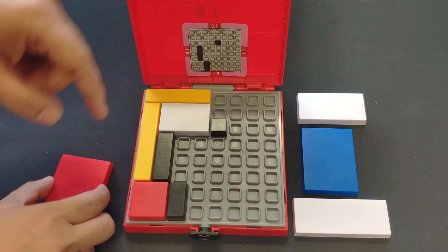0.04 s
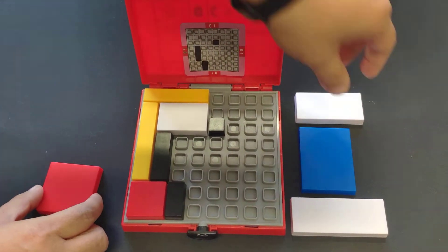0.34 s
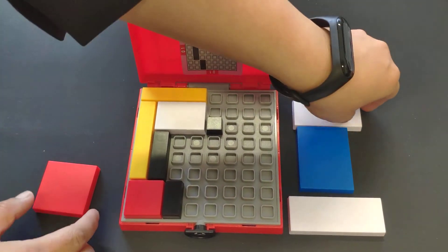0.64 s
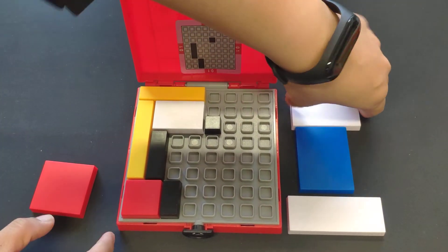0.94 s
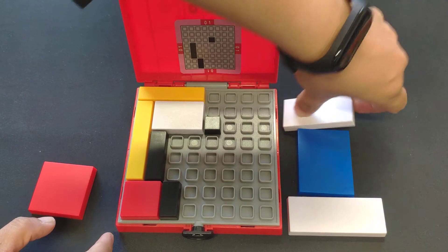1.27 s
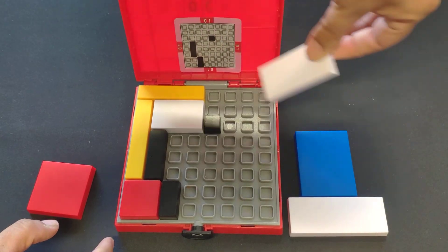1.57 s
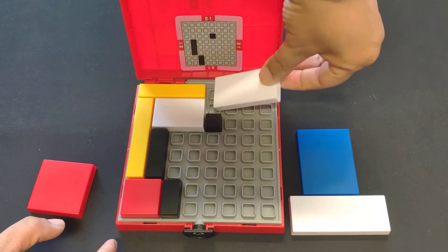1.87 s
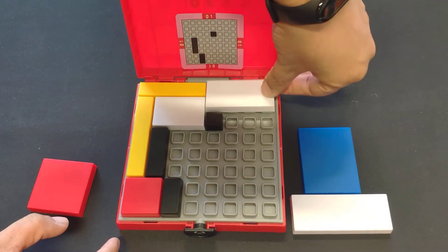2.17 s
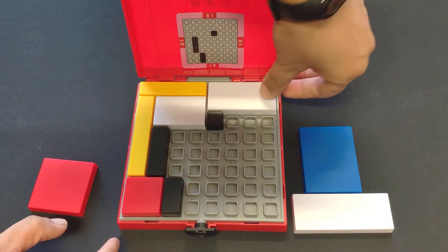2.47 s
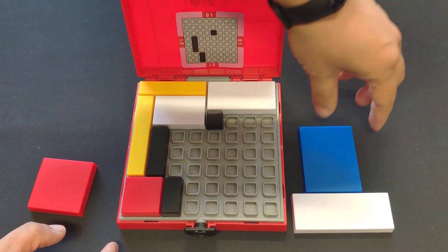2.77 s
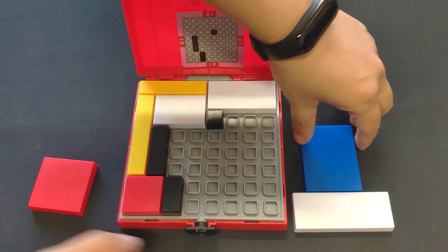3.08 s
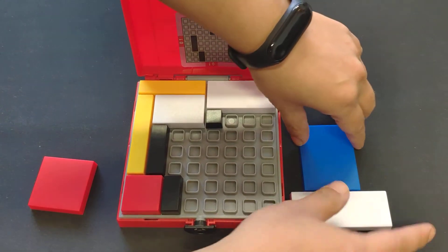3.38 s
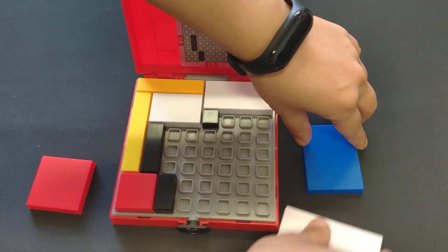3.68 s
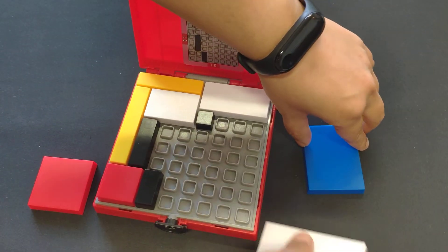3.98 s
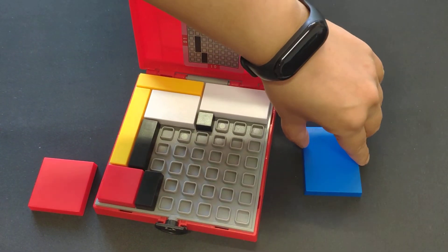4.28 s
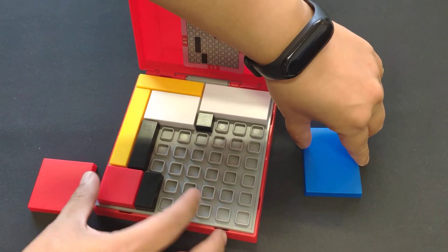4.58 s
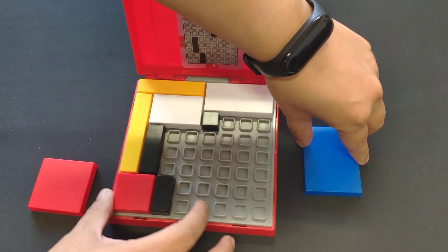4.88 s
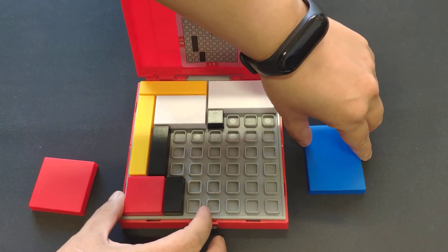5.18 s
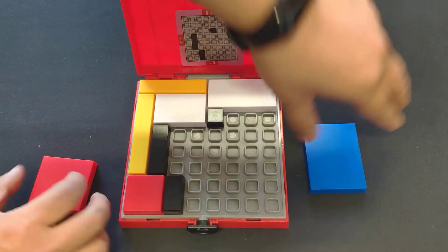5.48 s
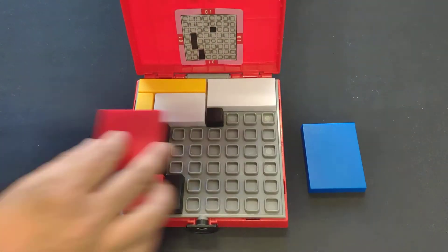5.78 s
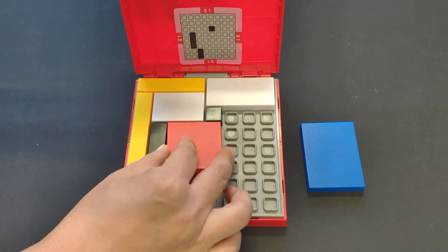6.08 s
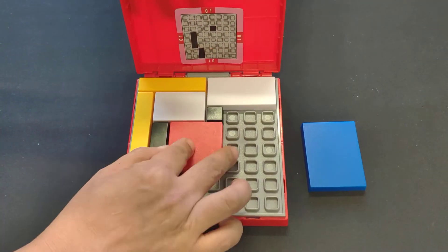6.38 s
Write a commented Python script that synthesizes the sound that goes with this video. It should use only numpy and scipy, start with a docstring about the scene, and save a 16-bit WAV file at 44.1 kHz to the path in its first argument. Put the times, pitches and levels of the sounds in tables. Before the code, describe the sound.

In a small room with a faint steady hum, a close microphone picks up light knocks as a plastic block is lifted from a mat, then bright clicks as it bounces and settles in a plastic tray. The tray slides quietly, and a block is set aside with a muffled thump on the desk. After a couple of light clicks, a second hollow block clatters in, grating briefly into place.

```python
"""Puzzle blocks in a plastic tray

Hollow plastic blocks are picked off a desk mat and dropped into a tray, where they clatter, ring,
scrape over the studs and settle. Blocks and tray rub over the mat in tiny slips, and one block is
put aside with a thump that shakes the desk. A small room answers and an appliance hums.
A phone above the desk listens through two ports of different colour."""
import sys
import numpy as np
from scipy import signal
from scipy.fft import rfft, irfft, next_fast_len
from scipy.io import wavfile
from scipy.ndimage import uniform_filter1d, map_coordinates

SR = 44100
rng = np.random.default_rng(int(sys.argv[2]) if len(sys.argv) > 2 else 0)


def generate_wav(sig):
    """Save sig (samples, or channels by samples) to the path in sys.argv[1] as 16-bit PCM at SR."""
    pcm = np.round(np.clip(np.atleast_2d(sig).T, -1, 1) * 32767).astype(np.int16)
    wavfile.write(sys.argv[1], SR, pcm)


N = 287973


# Plastic meets plastic. Each row: start in seconds, clack level in dB, hollow knock and treble tick
# in dB over the clack, ping of the struck spot in Hz, number of rebounds.
CONTACTS = [(0.31, -54.5, -20, -1, 2370, 0), (0.545, -51.5, 9.5, 4, 1020, 0),
            (0.556, -57.5, 13, 3, 1140, 1), (0.6, -51.5, 12, 9.5, 1970, 0), (0.61, -48, 13, 3, 1067, 0),
            (0.634, -48, 1, 1.5, 1150, 0), (0.787, -60.5, 2, -1, 2950, 0), (1.362, -42.5, -5, -12, 2390, 0),
            (1.374, -50, -1, 3, 2800, 0), (1.414, -51.5, 2, -15, 1920, 0), (1.865, -40, 5, -14, 1390, 0),
            (1.898, -48, 4.5, -12, 1530, 0), (2.084, -60.5, 11, -16, 1410, 0),
            (2.113, -53, 9, -16, 1430, 0), (2.128, -39, 3, -8.5, 1540, 0),
            (2.1437, -20.5, -9.5, -3.5, 5380, 0), (2.1542, -28.5, -10, -1, 2790, 3),
            (2.209, -29, -8, -4, 1910, 0), (2.2394, -29, -5, -2, 1770, 0), (2.2561, -41, -15, 0, 2760, 0),
            (3.624, -48, 0.5, -3, 986, 0), (3.883, -57.5, -15, 2, 10100, 0), (4.6808, -45, 0, -2, 12240, 0),
            (4.939, -52, -4, -16, 2040, 0), (5.192, -46.5, -4.5, -4.5, 3665, 1),
            (5.5406, -64.5, 9, 2, 1470, 0), (6.0137, -32, -3, -7.5, 1245, 0),
            (6.03, -25.5, -11, -3, 2500, 0), (6.111, -53, 5.5, -7, 2200, 0), (6.159, -47, -3, 6, 10540, 0),
            (6.162, -36, 3.5, -1, 1480, 0), (6.184, -40, 4.5, -1, 1250, 0),
            (6.2012, -31, -5.5, -9, 1590, 0), (6.2224, -43, 1.5, -10.5, 1220, 0),
            (6.307, -59.5, 4.5, -20, 1180, 0)]
PING_SPREAD = 0.084  # pitch scatter from spot to spot, in log Hz
def contacts(held_ring_db=-11, free_ring_db=-4, flight_s=.0066, shrink=.9, loss_db=1.0, dull_db=1.5):
    """Fingers damp a block's first contact; its rebounds ring free, ever sooner, weaker and duller."""
    hits = []
    for start, db, knock_db, tick_db, ping_hz, rebounds in CONTACTS + finger_touches():
        hits.append((start, db, knock_db, tick_db, held_ring_db, ping_hz))
        for k in range(1, round(rebounds) + 1):
            start += flight_s * shrink ** (k - 1)
            spot_hz = ping_hz * np.exp(PING_SPREAD * rng.normal())
            hits.append((start, db - k * loss_db, knock_db, tick_db - k * dull_db, free_ring_db, spot_hz))
    return hits


# Broad resonances of tray and block in contact. Each row: centre in Hz, width in Hz, level in dB.
SHELL = [(1081, 220, 12), (1507, 300, 3), (2000, 226, 6), (2610, 570, 0), (3836, 230, -3), (4700, 860, -4),
         (6260, 930, -6), (7200, 497, -6.5), (8700, 910, -8.5), (10950, 770, -6), (12750, 1340, -35),
         (15300, 1500, -25.5)]
def clatter(knock_t60=.021, clack_t60=.028, tick_t60=.024, ping_t60=.03, snap_s=.00059, square_from_s=4.5):
    """Each contact snaps, shakes the damped shells, pings at its own pitch and leaves a block ringing."""
    out, t = np.zeros((2, N)), np.arange(SR // 5) / SR
    unit_attack = lambda x: x / np.sqrt(np.mean(x[:, :round(.006 * SR)] ** 2))
    below = lambda hz, edge_hz: 1 / (1 + (hz / edge_hz) ** 4)
    bands = [lambda hz: (1 - below(hz, 750)) * below(hz, 1600),  # knock
             lambda hz: (1 - below(hz, 1600)) * below(hz, 6000),  # clack
             lambda hz: 1 - below(hz, 6000)]  # tick
    snap = 1 + amp(-1) * np.exp(-t / snap_s)
    shells, hits = [], contacts()
    for band, t60 in zip(bands, (knock_t60, clack_t60, tick_t60)):
        bursts = rng.standard_normal((len(hits), 2, SR // 20)) * (snap * fade(t, t60))[:SR // 20]
        shells.append(filtered(bursts, lambda hz: band(hz) * resonances(SHELL, hz)))
    for (start, db, knock_db, tick_db, ring_db, ping_hz), *shell_bands in zip(hits, *shells):
        # soft contacts feed the low modes, hard ones the high modes
        gains = amp([knock_db, 0, tick_db])
        drive = lambda hz: sum(gain * band(hz) for gain, band in zip(gains, bands))
        modes = LONG_MODES if start < square_from_s else SQUARE_MODES
        hit = amp(ring_db - 4) * block_ring(modes, drive, t)
        port_lag_s = rng.normal(.00005, .00003)
        ping = fade(t, ping_t60) * np.sin(2 * np.pi * ping_hz * np.array([t, t - port_lag_s]))
        hit += amp(-1) * drive(ping_hz) * unit_attack(ping)
        for burst, gain in zip(shell_bands, gains):
            add(hit, 0, gain * unit_attack(stereo(burst, NEAR_LIKENESS)))
        add(out, start, amp(db) * in_room(hit, wet_db=-9))
    return out


# The long and the square hollow block. Each row: pitch in Hz, level in dB, seconds to fall 60 dB.
LONG_MODES = [(1520, -17.5, .08), (1940, -6, 0.112), (2780, 1.5, 0.063), (3260, -0.5, 0.077),
              (3700, -6, 0.13), (5420, -5, 0.093), (5400, -1, 0.15), (6880, -18, .08), (7375, -6.5, 0.073),
              (8301, -11.5, .08), (9340, -1.5, 0.074), (10100, 3.5, 0.027)]
SQUARE_MODES = [(1140, 0, 0.076), (1554, 2, 0.15), (2090, -24, .06), (2500, -6, 0.047), (2960, -9, 0.057),
                (3670, 5, 0.089), (4460, 0, 0.068), (5860, 4, .05), (7360, 4, 0.047), (12400, 2, 0.07)]
def block_ring(modes, drive, t, spread_s=.00007):
    """Every point of contact weights a block's modes anew; high modes reach the two ports out of step."""
    hz, db, t60 = np.transpose(modes)
    turns = rng.random(len(hz)) + hz * spread_s * rng.standard_normal((2, len(hz)))
    weights = drive(hz) * amp(db + rng.normal(0, 1.6, turns.shape)) * np.exp(2j * np.pi * turns)
    partials = fade(t, t60[:, None]) * np.exp(2j * np.pi * hz[:, None] * t)
    return (weights @ partials).imag


# Fingers shift their grip. Each row: start and end in seconds.
GRIP_SHIFTS = [(3.7, 3.8), (5.0, 5.14), (5.49, 5.55)]
def finger_touches(per_shift=2, db=-64, spread_db=1.5, knock_db=8.5, tick_db=-8.5, ping_hz=1680):
    """Faint chance contacts while a block is handled, as rows like those of CONTACTS."""
    return [(rng.uniform(*sorted(span)), db - spread_db * rng.normal(), knock_db, tick_db,
             ping_hz * np.exp(PING_SPREAD * rng.normal()), 0)
            for span in np.repeat(GRIP_SHIFTS, per_shift, axis=0)]


# Dull pushes through the mat. Each row: start in seconds, gain in dB, desk shudder in dB over the push.
THUMPS = [(.546, -7.5, 7), (0.602, -11, 13), (1.866, -3.5, -3.5), (2.155, -7.5, 10.5), (2.24, -8.5, 6),
          (3.624, -9, 0.5), (3.668, -12.5, 1.5), (4.2977, 20, -14.5), (6.163, -8, 9)]
# Their muffled tone. Each row: frequency in Hz, gain in dB.
THUMP_TONE = [(60, -29), (200, -12.5), (330, 0), (480, 2.5), (750, -5), (1050, 0.5), (1400, -5.5),
              (1700, -15), (2400, -21.5), (3500, -30.5), (8000, -41.5), (16000, -44.5)]
def thumps(rock_s=0.001544, rock_db=-6, port_lag_s=.00018, shudder_t60=0.26):
    """A thing meets the soft mat with one edge, then the other, and the desk shudders."""
    out, t = np.zeros((2, N)), np.arange(SR // 5) / SR
    for start, db, shudder_db in THUMPS:
        shudder = stereo(rng.standard_normal((2, len(t))) * fade(t, shudder_t60), NEAR_LIKENESS)
        push = amp(shudder_db) * unit(shudder) / np.sqrt(len(t))
        for port, lag in enumerate((0, port_lag_s)):  # the right port hears it later
            push[port, round(lag * SR)] += 1
            push[port, round((lag + rock_s) * SR)] += amp(rock_db)
        thud = filtered(push, lambda hz: amp(curve(THUMP_TONE, hz)))
        add(out, start, amp(db) * in_room(thud, wet_db=-10.5))
    return out


# Edges over the studs, and drags of the pressed long block.
# Each row: start in seconds, length in seconds, peak in dB.
STUD_SCRAPES = [(2.0, 0.036, -54.5), (2.115, 0.045, -38), (6.04, 0.25, -50), (6.14, 0.077, -43.5)]
DRAGS = [(0.535, .075, -44.5), (1.24, .09, -53)]
# The air space in the long block. Each row: centre in Hz, width in Hz, level in dB.
CAVITY = [(996, 150, 3), (2460, 210, -7.5)]
def scrapes():
    """Blocks grate over the tray's studs as they are worked into place; a dragged one drones briefly."""
    studs = rub(STUD_SCRAPES, lambda hz: resonances(SHELL, hz) / np.hypot(1, hz / 2600), rough_db=0.0)
    drone = rub(DRAGS, lambda hz: resonances(CAVITY, hz), rough_db=3.0)
    return stereo(studs + drone, NEAR_LIKENESS)


# Strokes over the mat by the square block, the long block, and the tray or fingers.
# Each row: start in seconds, length in seconds, peak in dB.
SQUARE_SLIDES = [(-0.11, 0.36, -59)]
LONG_SLIDES = [(0.603, 0.039, -43), (1.13, 0.13, -54.5), (1.2, 0.27, -56.5), (1.395, .085, -48.5),
               (3.5, 0.19, -61)]
TRAY_SLIDES = [(2.97, .6, -61.5), (3.52, 0.34, -53), (3.86, .14, -62.5), (3.94, 0.48, -57),
               (5.52, 0.095, -59)]
# The blocks' voices when held and rubbed. Each row: centre in Hz, width in Hz, level in dB.
SQUARE_BODY = [(4380, 160, 0), (6400, 350, -9), (8300, 650, -9), (10400, 770, -7), (12600, 900, -12)]
LONG_BODY = [(1020, 180, 0), (1960, 170, 3), (2780, 220, -24), (4240, 490, -8.5), (5470, 320, -5),
             (7270, 340, -5), (9640, 640, -10.5), (12100, 450, -12.5)]
# The mat's swish. Each row: frequency in Hz, gain in dB.
MAT_TONE = [(300, -13), (1000, -3), (2200, -1.5), (3700, -4.5), (5400, 0), (6500, -4.5), (8000, -4.5),
            (10000, 2), (12500, -1.5), (15500, -8.5)]
def slides():
    """Two blocks, the tray and the fingers rub over the mat."""
    square = rub(SQUARE_SLIDES, lambda hz: resonances(SQUARE_BODY, hz), rough_db=0.5, patchy_db=-1.0)
    long = rub(LONG_SLIDES, lambda hz: resonances(LONG_BODY, hz), rough_db=-0.5)
    tray = rub(TRAY_SLIDES, lambda hz: amp(curve(MAT_TONE, hz)), rough_db=2.0, patchy_db=2.0)
    return square + long + tray


def rub(strokes, colour, rough_db, patchy_db=4.5):
    """Tiny uneven slips, coloured by the thing that slides; the colour shifts as the contact moves."""
    slips = rng.standard_normal((2, N)) * amp(rough_db * wobble(160))
    spectra = signal.stft(slips, nperseg=256)[2]
    patches = uniform_filter1d(rng.standard_normal(spectra.shape[1:]), size=3, axis=0)
    patches = uniform_filter1d(patches, size=20, axis=1)
    slips = signal.istft(spectra * amp(patchy_db * unit(patches)), nperseg=256)[1][:, :N]
    return hand_swell(strokes) * unit(filtered(slips, colour))


def hand_swell(strokes, speed_power=1.4):
    """In each stroke the hand speeds up and slows to rest, and the rubbing level follows its speed."""
    t, power = np.arange(N) / SR, np.zeros(N)
    for start, length, db in strokes:
        speed = np.abs(np.sin(np.pi * np.clip((t - start) / length, 0, 1)))
        power += (amp(db) * speed ** speed_power) ** 2
    return np.sqrt(power)


# The small room's short tail. Each row: frequency in Hz, seconds to fall 60 dB.
ROOM_DECAY = [(200, 0.2), (1000, 0.2), (2700, 0.23), (7000, 0.19), (15000, 0.14)]
def in_room(sound, wet_db, wall_s=.0125, wall_db=-6, wall_t60=0.027, build_s=0.0014):
    """A sound with the near wall's answer and the room's diffuse tail."""
    hz, t, spectra = signal.stft(rng.standard_normal((2, SR // 2)), SR, nperseg=256)
    tail = signal.istft(spectra * fade(t, curve(ROOM_DECAY, hz)[:, None]), SR, nperseg=256)[1]
    t = np.arange(tail.shape[1]) / SR
    wall = (t > wall_s) * fade(np.abs(t - wall_s), wall_t60) * rng.standard_normal(tail.shape)
    answer = unit(tail * (1 - np.exp(-t / build_s))) + amp(wall_db) * unit(wall)
    answer = stereo(answer, ROOM_LIKENESS) / np.sqrt(len(t))
    out = amp(wet_db) * signal.fftconvolve(sound, answer, axes=1)
    add(out, 0, sound)
    return out


# The appliance's tones. Each row: pitch in Hz, level in dB, depth of the waver as a fraction.
HUM_TONES = [(97.4, -56.5, 0.34), (389.4, -60, 0.24)]
def appliance_hum():
    """An appliance hums, its tones wavering in level and phase."""
    t, hum = np.arange(N) / SR, np.zeros(N)
    for hz, db, depth in HUM_TONES:
        waver = 1 + depth * (wobble(4.43) + 1j * wobble(3.3))
        hum += amp(db) * unit(np.real(waver * np.exp(2j * np.pi * hz * t)))
    return hum


# The noise bed's colour. Each row: frequency in Hz, relative level in dB.
AIR_TONE = [(15, -46), (28, -12.5), (45, -10.5), (80, -12.5), (120, -8.5), (160, -7), (290, -12.5),
            (490, -18), (1130, -22.5), (2760, -33.5), (4300, -38.5), (6300, -44), (9000, -43), (10900, -39),
            (12500, -43), (16000, -45.5)]
def room_air(db=-52.0):
    """Steady low room noise with faint microphone hiss on top."""
    noise = stereo(rng.standard_normal((2, N)), ROOM_LIKENESS)
    return amp(db) * unit(filtered(noise, lambda hz: amp(curve(AIR_TONE, hz))))


# Stereo width of desk and room. Each row: frequency in Hz, left-right likeness from 0 (wide) to 1 (mono).
NEAR_LIKENESS = [(300, 0.94), (1100, 0.79), (2200, 0.39), (4000, 0), (15000, 0.61)]
ROOM_LIKENESS = [(60, 0.954), (130, 1), (290, 0.94), (640, 0.065), (1400, 0), (15000, 0)]
def stereo(pair, likeness):
    """Mix two unrelated signals into left and right of the given likeness."""
    mid, side = filtered(pair, lambda hz: np.sqrt((1 + np.outer([1, -1], curve(likeness, hz))) / 2))
    return np.array([mid + side, mid - side])


# How desk sounds and background lean. Each row: frequency in Hz, left over right in dB.
NEAR_BALANCE = [(150, 2.5), (380, -5.5), (700, 3), (1300, 0.5), (3400, -1.5), (4800, 2), (6400, 6),
                (7800, 1.5), (9000, -13), (10200, -21.5), (12500, -15), (15500, -9)]
ROOM_BALANCE = [(110, 0), (380, -2.5), (700, 2.5), (1200, -2.5), (2400, 0), (6400, 2.5), (8000, 0),
                (10300, -21), (13000, -8), (15500, -10)]
def ports(x, balance):
    """Each microphone port favours its own frequencies."""
    return filtered(x, lambda hz: np.sqrt(2 / (1 + amp(np.outer([-2, 2], curve(balance, hz))))))


def amp(db):
    return 10 ** (np.asarray(db) / 20)


def unit(x):
    return x / np.sqrt(np.mean(x ** 2) + 1e-20)


def fade(t, t60):
    """Exponential decay, 60 dB down after t60."""
    return np.exp(-np.log(1000) * t / t60)


def curve(points, hz):
    """Join (Hz, value) points on a log frequency axis."""
    knots_hz, values = np.transpose(points)
    return np.interp(np.log(hz + 1), np.log(knots_hz + 1), values)


def wobble(rate):
    """A smooth random curve, rate knots a second."""
    return map_coordinates(rng.standard_normal(int(N * rate / SR) + 4), [np.arange(N) * rate / SR])


def resonances(modes, hz):
    """Gain of a body with (Hz, width, dB) resonances."""
    return np.sqrt(sum(amp(2 * db) * (hz * width) ** 2 / ((centre ** 2 - hz ** 2) ** 2 + (hz * width) ** 2)
                       for centre, width, db in modes))


def filtered(x, gain):
    """Causal (minimum-phase) filter with the given gain over frequency."""
    n = x.shape[-1]
    size = 2 * next_fast_len(n // 2 + SR // 20)
    cepstrum = irfft(np.log(np.maximum(gain(np.fft.rfftfreq(size, 1 / SR)), 1e-5)), size)
    cepstrum[..., 1:size // 2] *= 2
    cepstrum[..., size // 2 + 1:] = 0
    return irfft(rfft(x, size) * np.exp(rfft(cepstrum)), size)[..., :n]


def add(track, start, sound):
    """Mix a sound into a track, start seconds in."""
    part = track[:, round(start * SR):][:, :sound.shape[1]]
    part += sound[:, :part.shape[1]]


def scene():
    """The handling on the desk over hum and room air, heard through the two ports."""
    desk = clatter() + thumps() + slides() + scrapes()
    return ports(desk, NEAR_BALANCE) + ports(appliance_hum() + room_air(), ROOM_BALANCE)


def record(dry, top_hz=16000):
    """The phone keeps nothing above its band limit."""
    size = next_fast_len(N + SR // 2)
    return irfft(rfft(dry, size) * (np.fft.rfftfreq(size, 1 / SR) < top_hz), size)[:, :N]


dry = scene()
out = record(dry)
generate_wav(out)
```